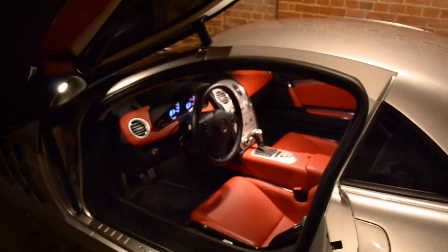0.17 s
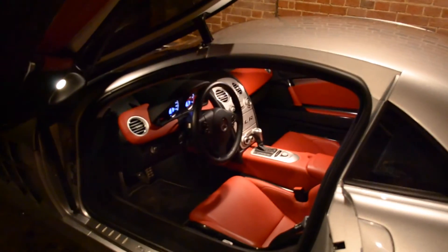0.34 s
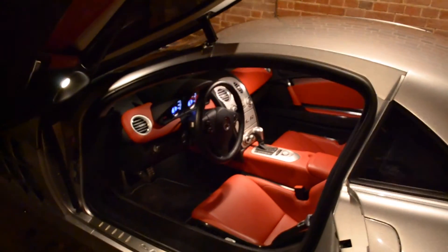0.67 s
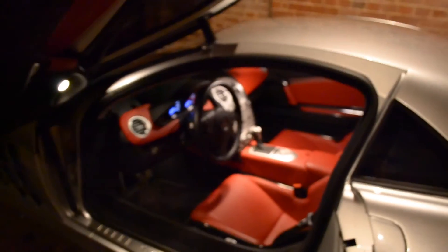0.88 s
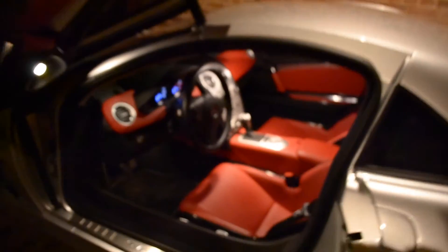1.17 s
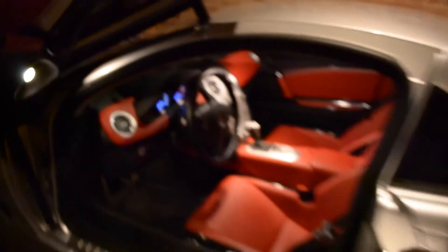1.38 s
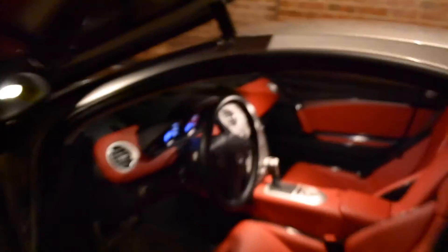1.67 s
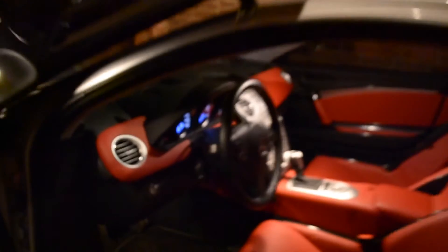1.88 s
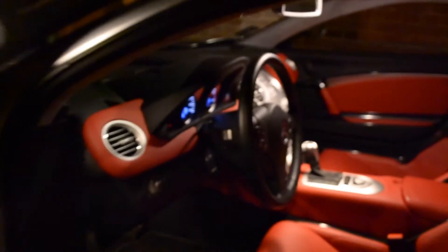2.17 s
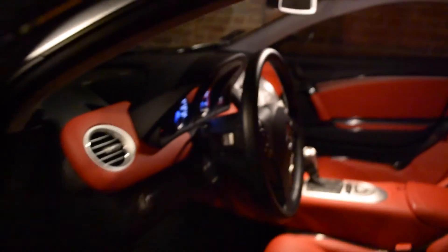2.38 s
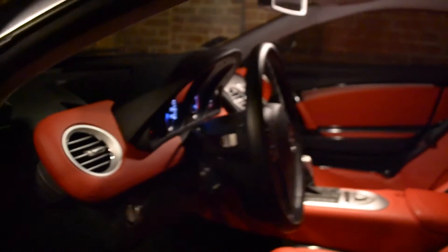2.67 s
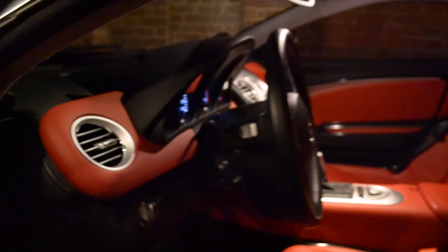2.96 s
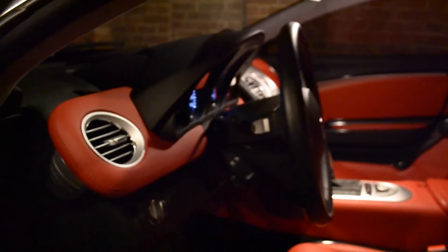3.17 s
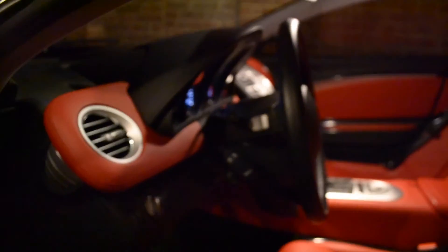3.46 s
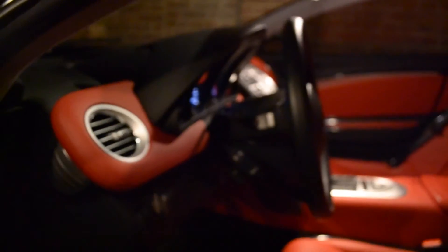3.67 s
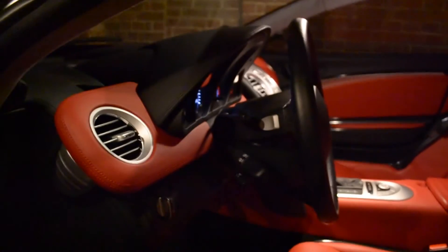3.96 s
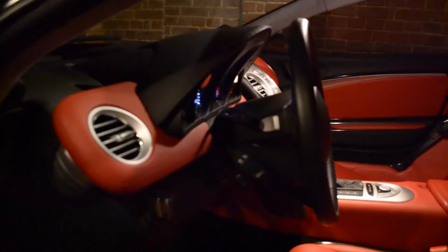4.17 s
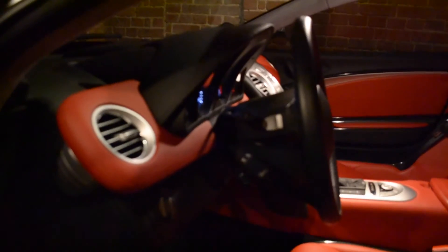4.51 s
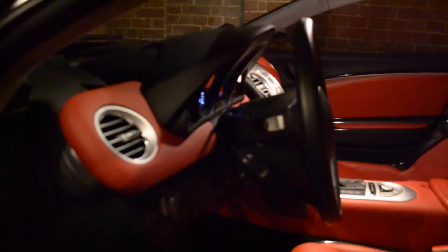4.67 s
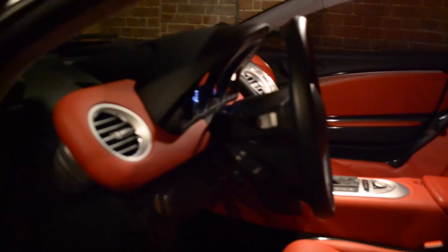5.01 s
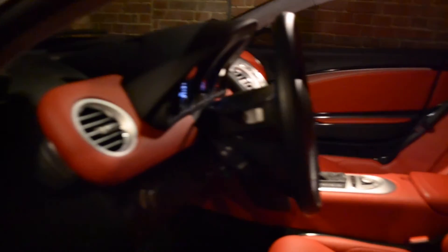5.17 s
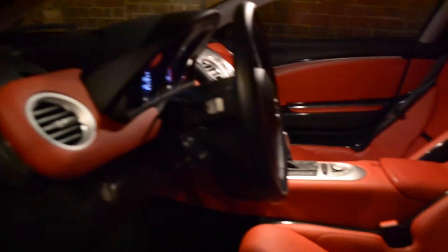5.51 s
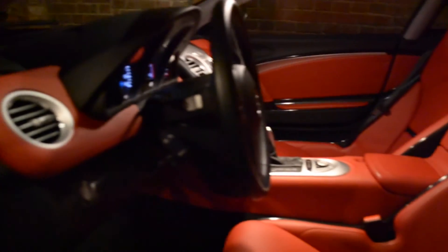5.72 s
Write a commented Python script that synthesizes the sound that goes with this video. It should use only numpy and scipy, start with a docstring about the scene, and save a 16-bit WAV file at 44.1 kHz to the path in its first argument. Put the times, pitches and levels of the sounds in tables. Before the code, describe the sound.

Close up, a camera lens whirs and clicks as it refocuses, something hard snaps against the body, then the motor whirs again.

```python
"""A camera's autofocus motor hunting in two spells, heard through the body by the camera's own microphone.
Each move starts with a tick, whirs through a small gear train and stops with a click; the lens knocks.
Between the spells hands bump the camera and something hard snaps once against it, right at the mic.
The place is outdoors on a quiet night, with far traffic dying away. Mono."""
import sys
import numpy as np
from scipy import signal
from scipy.fft import rfft, irfft
from scipy.io import wavfile
from scipy.ndimage import uniform_filter1d

SR = 44100
rng = np.random.default_rng(int(sys.argv[2]) if len(sys.argv) > 2 else 0)


def transcribe(signal):
    """Save signal, clipped to [-1, 1], as a 16-bit WAV file at the path in sys.argv[1]."""
    frames = np.atleast_2d(signal).T
    limited = np.clip(frames, -1, 1)
    pcm = np.round(limited * 32767).astype(np.int16)
    wavfile.write(sys.argv[1], SR, pcm)


N = 257984
TIME = np.arange(N) / SR

# moves of the lens: start_s, stop_s, braking_s, top_tooth_hz, hunt_period_s, hunt_swing_ratio,
# whir_db, whine_gain_db, tick_gain_db, bite_gain_db, click_gain_db
LENS_MOVES = [(-.1, .0396, 0, 510, .18, 0, -55.3, 0, 0, 0, -9.5),
              (0.1017, .3613, 0, 1650, 0.17, .065, -53.1, 0, 0, 1.5, .5),
              (0.4341, 0.82, 0, 1560, .16, .025, -53.5, -1, 0, 0, -12),
              (3.2702, 3.5918, .122, 1350, .2, .06, -55, 1.5, -7, -18, -9),
              (3.646, 4.2287, 0, 1600, .168, .042, -53.5, -1.5, -2, -.5, .5),
              (4.3223, 4.3884, 0, 1000, .18, 0, -54.3, 0, -1, -.5, -14)]
# gear scrape through the barrel, at full speed and creeping: frequency_hz, gain_db
RUNNING_COLOUR = [(88, -79), (150, -39), (167, -60), (396, -13.5), (474, -12), (1180, -14), (1550, -8),
                  (2140, -14.5), (2660, -7), (3680, -18), (4730, -19.5), (5560, -25.5), (8250, -23.5),
                  (10100, -25.5), (11000, -31), (14300, -66), (22000, -120)]
CREEPING_COLOUR = [(180, -65), (300, -10), (508, -9), (730, -29), (1000, -17), (2330, -2), (2630, 4),
                   (3060, -4.5), (4070, 0.5), (4900, -5), (5900, -1), (7200, -8), (9180, -10.5),
                   (11000, -10), (14300, -109), (22000, -120)]
# whine of the teeth: tooth_rate_multiple, gain_db
WHINE_HARMONICS = [(1, -.5), (2, -7.5), (3, 1), (4, -9), (5, -5.5)]
# resonances of the gearbox, the lens barrel and the snapped shell: pitch_hz, width_hz, gain_db
GEARBOX_MODES = [(1657, 320, 5), (2730, 150, -2), (3250, 400, -2), (3890, 300, 2.5), (4900, 140, -9),
                 (6100, 670, -8), (8030, 330, -16)]
BARREL_MODES = [(1924, 290, 6), (2635, 70, 1), (3330, 160, -0.5), (4030, 560, 0.5), (5440, 140, 1.5),
                (6450, 240, -25.5), (8950, 480, -6), (9700, 290, -41.5)]
SHELL_MODES = [(510, 220, -9), (763.3, 125, -14), (1610, 250, -7.5), (2006, 180, 0), (2630, 170, 1.5),
               (2850, 190, 0.5), (3740, 270, 1), (4120, 400, -4), (5190, 230, -2), (6210, 700, -4),
               (7530, 450, -1), (9107, 670, -5), (10500, 450, -8)]
# night air and distant tyres: frequency_hz, gain_db
NIGHT_COLOUR = [(15, -76), (25, -41), (59, -12.5), (156, -14), (178, -6), (235, -11.5), (274, -7.5),
                (456, -12), (492, -9), (545, -12), (798, -11), (1000, -9.5), (1510, -8.5), (1850, -13),
                (11000, -42), (14300, -82.5), (22000, -120)]
TRAFFIC_COLOUR = [(59, -47), (100, -15), (224, -16), (307, -10.5), (446, -15), (853, -1.5), (1290, -0.5),
                  (3730, -18.5), (7870, -38.5), (9040, -34), (11000, -47.5), (14300, -82), (22000, -120)]
# contacts in the drive: body_db, gear_db, tooth_db, ring_hz, ring_db, rattle_s
MOTOR_KICK = (-59, -50, -41.5, 5602, -54, .0031)
SLACK_RATTLE = (-61, -45, -62, 2610, -52, .005)
TEETH_BITE = (-59, -40.5, -41, 2628, -45, .0055)
MOTOR_HALT = (-49, -39, -46, 4840, -42, .0062)
LENS_CATCH = (-44, -43, -57, 2700, -39.5, .0042)
# the lens catches or meets an end stop: start_s, gain_db, body_shake_db
LENS_KNOCKS = [(0.4286, -1.5, 3), (0.6965, .5, 1), (0.821, 3.5, 7), (2.553, -14, 6), (2.8532, -17.5, 5),
               (3.1025, -11.5, 5), (3.2885, -4.5, -6), (3.4434, -6.5, 2), (3.698, -5.5, 2.5),
               (3.7577, -5, 0), (4.001, -7, 2), (4.374, -9, 6), (4.3888, 0, 3)]
# sleeves brushing as the camera moves: start_s, length_s, level_db
SLEEVE_BRUSHES = [(1.25, 0.3, -72.5), (1.516, 0.16, -56.5), (1.75, 0.55, -61.5), (2.6, 0.67, -72.5),
                  (5.12, 0.27, -73), (5.6, .25, -80)]
# thin finger scuffs and dull hand bumps: start_s, level_db, decay_s
FINGER_SCUFFS = [(1.263, -53, .0018), (1.803, -52.5, 0.014)]
HAND_BUMPS = [(1.495, -33, 0.026), (1.521, -36.5, 0.034), (2.046, -48.5, 0.0096), (2.147, -43, 0.016),
              (2.159, -47, 0.016), (2.339, -42.5, 0.011), (2.36, -50, 0.025), (2.55, -61, 0.0079)]
# cloth and bumps as they reach the microphone: frequency_hz, gain_db
SLEEVE_COLOUR = [(400, -2.5), (2000, 2.5), (4000, -1), (6500, -5), (8000, -12), (9500, -11.5), (11000, -13)]
BUMP_COLOUR = [(59, -50), (100, -18.5), (270, -10), (436, 3), (851, 2.5), (1160, 1.5), (1780, -4.5),
               (2150, -14.5), (4260, -30), (6000, -33), (7800, -62.5), (13200, -120)]
# the snap and its bounces: start_s, level_db, decay_s
SNAP_HITS = [(1.5715, 0, .0005), (1.5745, -22, .0015), (1.586, -23, .002), (1.5918, -23.5, .0012),
             (1.6103, -33, .0015)]

SLACK_S = .0145  # from the motor's kick until the teeth bite


def undb(db):
    """Decibels to gain."""
    return 10 ** (np.asarray(db) / 20)


def unit(x):
    """Scale to rms 1."""
    return x / np.sqrt(np.mean(x ** 2))


def colour(x, points, size=4096):
    """Causal filter through (frequency_hz, gain_db) points that keeps the power of white noise."""
    hz, db = np.transpose(points)
    log_hz = np.log(np.fft.rfftfreq(size, 1 / SR) + 1)
    log_gain = np.log(undb(np.interp(log_hz, np.log(hz), db)))
    cepstrum = irfft(log_gain)
    cepstrum[1:size // 2] *= 2
    cepstrum[size // 2 + 1:] = 0
    response = irfft(np.exp(rfft(cepstrum)))
    return signal.fftconvolve(x, response / np.linalg.norm(response))[:N]


def ring(x, modes):
    """Sum of the resonances that x excites."""
    return sum(undb(db) * signal.lfilter(*signal.iirpeak(hz, hz / width, fs=SR), x)
               for hz, width, db in modes)


def band(x, low_hz, high_hz):
    """Band-pass that keeps the power of white noise."""
    sos = signal.butter(2, [low_hz, high_hz], "band", fs=SR, output="sos")
    return signal.sosfilt(sos, x) * np.sqrt(SR / 2 / (high_hz - low_hz))


def drift(rate_hz):
    """Random wavering of rms 1, gliding to a new value about rate_hz times a second."""
    hold = max(int(SR / rate_hz), 1)
    return unit(uniform_filter1d(rng.standard_normal(N)[np.arange(N) // hold], hold))


def contacts(rows, size=4096):
    """Bursts of tiny impacts (start_s, level_db, decay_s), each with the energy of 1 ms at its level."""
    out = np.zeros(N + size)
    for start_s, db, decay_s in rows:
        fade = np.exp(-np.arange(size) / SR / decay_s / 2)
        spectrum = rfft(rng.standard_normal(size) * fade)
        burst = irfft(spectrum / np.abs(spectrum)) * fade
        start = max(int(start_s * SR), 0)
        out[start:start + size] += undb(db) * burst * np.sqrt(SR / 1000 / np.sum(burst ** 2))
    return out[:N]


def motor(creep_hz=540.6, ramp_hz_per_s=10700, settle_s=1.2, push_db=3, push_s=.071, coast_db=-3.5):
    """The motor creeps through the slack, ramps up, hunts about its top speed and may brake."""
    tooth_hz, strength, whine_gain = np.full(N, creep_hz), np.zeros(N), np.ones(N)
    for start, stop, braking_s, top_hz, period_s, swing, db, whine_db, *_ in LENS_MOVES:
        on = (TIME >= start) & (TIME < stop)
        t = TIME[on]
        ramp_hz = creep_hz + ramp_hz_per_s * np.maximum(t - start - SLACK_S, 0)
        cruising_s = np.maximum(ramp_hz - top_hz, 0) / ramp_hz_per_s
        hunt = swing * np.exp(-cruising_s / settle_s) * np.sin(2 * np.pi * cruising_s / period_s)
        braked_s = np.maximum(t - stop + braking_s, 0)
        rate_hz = np.minimum(ramp_hz, top_hz) * (1 + hunt) - ramp_hz_per_s * braked_s
        coasting = (braked_s > 0) & (rate_hz < creep_hz)
        tooth_hz[on] = np.maximum(rate_hz, creep_hz)
        # louder while it gets the lens going, softer once it has braked
        strength[on] = undb(db + push_db * np.exp(-(t - start) / push_s) + coast_db * coasting)
        whine_gain[on] = undb(whine_db)
    return tooth_hz, uniform_filter1d(strength, size=90), whine_gain


def barrel(x, direct_db=0):
    """The lens barrel passes the drive's vibration on to the microphone and adds its own rings."""
    return undb(direct_db) * x + ring(x, BARREL_MODES)


def gears(wobble=.029, wander=.012, flutter=.59, grain_db=-1, throb=.2, pinion_teeth=9):
    """Meshing teeth whine and scrape; each overtone swells as it sweeps through a gearbox resonance."""
    tooth_hz, strength, whine_gain = motor()
    pace = np.clip((tooth_hz - 700) / 800, 0, 1)
    # the teeth rattle in their play, more so the faster they run
    jitter = pace ** 2 * wobble * drift(700) + wander * drift(90)
    phase = 2 * np.pi * np.cumsum(tooth_hz * (1 + jitter)) / SR
    mesh = sum(undb(db) * (1 + flutter * drift(380)) * np.sin(multiple * phase)
               for multiple, db in WHINE_HARMONICS)
    whine = undb(-2.5) * ring(mesh, GEARBOX_MODES)
    whine_share = whine_gain * np.interp(tooth_hz, [680, 950], [0, 1])  # comes in with speed
    # the scrape comes in fine grains and swells once per turn of the pinion
    force = undb(grain_db * drift(3000)) * (1 + throb * np.sin(phase / pinion_teeth))
    scrape = barrel(force * rng.standard_normal(N), direct_db=-2.5)
    running = unit(colour(scrape, RUNNING_COLOUR))
    creeping = undb(-2) * unit(colour(scrape, CREEPING_COLOUR))
    return strength * (pace * running + (1 - pace) * creeping + whine_share * whine)


def night_air(level_db=-66, waver_db=.4):
    """The steady hush of the night all around the microphone."""
    return colour(rng.standard_normal(N), NIGHT_COLOUR) * undb(level_db + waver_db * drift(6))


def far_traffic(start_db=-57, rest_db=-78.5, recedes_at_s=1.7, fade_db_per_s=10, waver_db=.4):
    """Tyre noise in the distance holds its level, then recedes to a faint rest."""
    level_db = np.maximum(start_db - fade_db_per_s * np.maximum(TIME - recedes_at_s, 0), rest_db)
    return colour(rng.standard_normal(N), TRAFFIC_COLOUR) * undb(level_db + waver_db * drift(12))


def strike(times, gain_db, contact, shake_db=0, ring_s=.0017):
    """Contacts of one kind shake the body, rattle gears and teeth and ring one part of the drive."""
    body_db, gear_db, tooth_db, ring_hz, ring_db, rattle_s = contact

    def bursts(part_db, decay_s):
        return contacts((s, db, decay_s) for s, db in zip(times, gain_db + part_db) if s > 0)

    body = band(bursts(body_db + shake_db, 1.29 * rattle_s), 336, 1450)
    gear = band(bursts(gear_db, rattle_s), 1240, 3780)
    tooth = band(bursts(tooth_db, .33 * rattle_s), 5160, 8750)
    ringing = np.zeros(N)
    for start, db in zip(times, gain_db):
        on = (TIME >= start) & (TIME < start + 20 * ring_s)
        age_s = TIME[on] - start
        swell = age_s / ring_s * np.exp(1 - age_s / ring_s)
        ringing[on] += undb(db + ring_db) * swell * np.sin(2 * np.pi * ring_hz * age_s)
    return body + barrel(gear + tooth) + ringing


def drive_ticks(rattle_after_s=.01):
    """The motor kicks in, the gears rattle through their play, the teeth bite; the halt clicks."""
    start_s, stop_s, *_, tick_db, bite_db, click_db = np.transpose(LENS_MOVES)
    kicks = strike(start_s, tick_db, MOTOR_KICK)
    rattles = strike(start_s + rattle_after_s, bite_db, SLACK_RATTLE)
    bites = strike(start_s + SLACK_S, bite_db, TEETH_BITE)
    halts = strike(stop_s, click_db, MOTOR_HALT)
    return kicks + rattles + bites + halts


def lens_knocks():
    """The lens knocks in its barrel and shakes the body that holds the microphone."""
    start_s, gain_db, shake_db = np.transpose(LENS_KNOCKS)
    return strike(start_s, gain_db, LENS_CATCH, shake_db)


def handling(bump_gain_db=6, cloth_rest_db=-85, attack_s=.016, release_s=.16, patchy_db=2):
    """Close on the microphone, hands bump the grip, fingers scuff and sleeves hiss unevenly."""
    bumps = undb(bump_gain_db) * colour(contacts(HAND_BUMPS), BUMP_COLOUR)
    scuffs = band(contacts(FINGER_SCUFFS), 5800, 10000)
    power = undb(cloth_rest_db) ** 2
    for start, length_s, db in SLEEVE_BRUSHES:
        attack = np.clip((TIME - start) / attack_s, 0, 1)
        release = np.exp(-np.maximum(TIME - start - length_s, 0) / release_s)
        power = power + (undb(db) * attack * release) ** 2
    cloth = colour(rng.standard_normal(N), SLEEVE_COLOUR) * np.sqrt(power) * undb(patchy_db * drift(79))
    return bumps + scuffs + cloth


def snap(shell_db=3, crack_db=-6.5, ceiling=.58, low_cut_hz=520, echo_db=-25, echo_s=.038):
    """Something hard hits the camera and bounces; the surroundings return a short, faint echo."""
    blow = contacts(SNAP_HITS)
    hit = undb(shell_db) * ring(blow, SHELL_MODES) + undb(crack_db) * blow
    # so close a blow overloads the microphone, which passes little bass
    hit = ceiling * np.tanh(hit / ceiling)
    hit = signal.sosfilt(signal.butter(1, low_cut_hz, "high", fs=SR, output="sos"), hit)
    reflections = rng.standard_normal(N) * np.exp(-TIME / echo_s)
    echo = signal.fftconvolve(hit, reflections / np.linalg.norm(reflections))[:N]
    return hit + undb(echo_db) * echo


def scene():
    """The camera's own noises up close and the night far behind, at a single microphone."""
    close = gears() + drive_ticks() + lens_knocks() + snap() + handling()
    return (close + night_air() + far_traffic())[None]


def record(dry):
    """The camera cuts the treble steeply above 10.3 kHz."""
    return signal.sosfilt(signal.ellip(8, .2, 66, 10300, fs=SR, output="sos"), dry)


dry = scene()
out = record(dry)
transcribe(out)
```